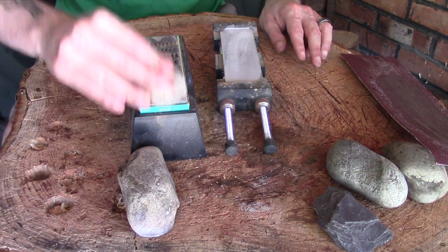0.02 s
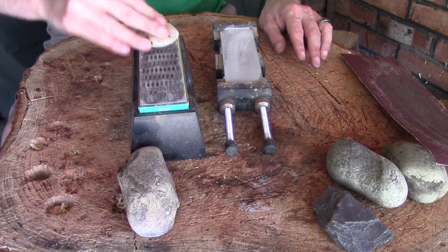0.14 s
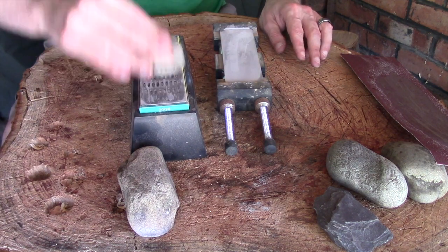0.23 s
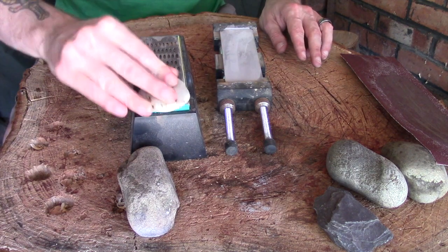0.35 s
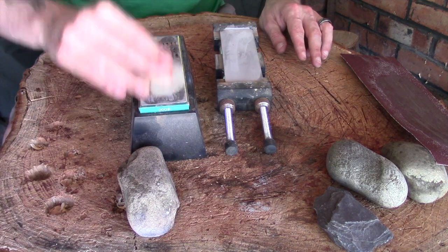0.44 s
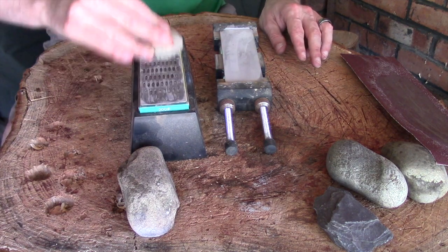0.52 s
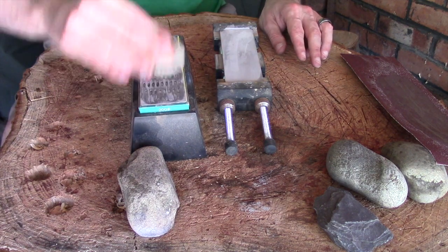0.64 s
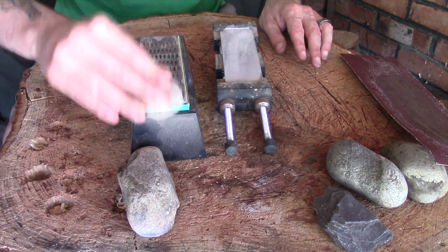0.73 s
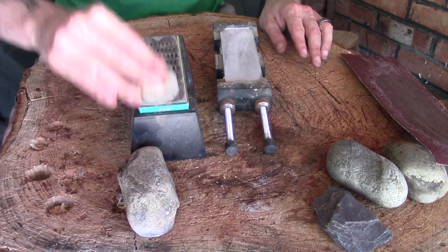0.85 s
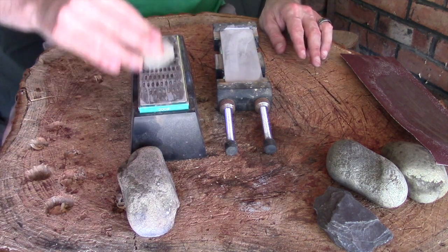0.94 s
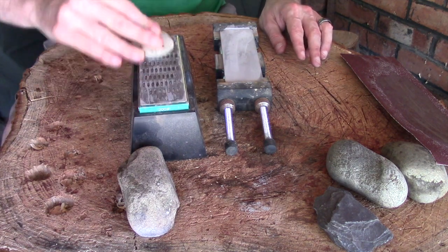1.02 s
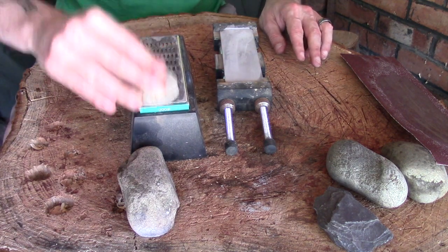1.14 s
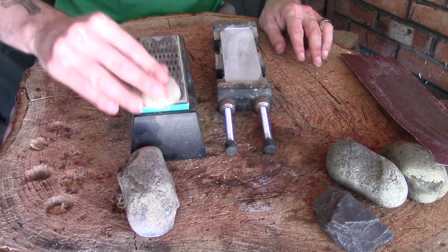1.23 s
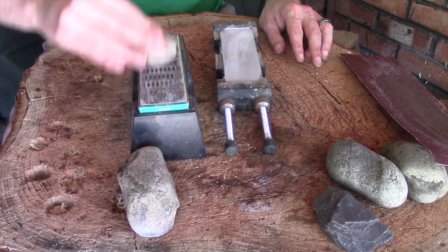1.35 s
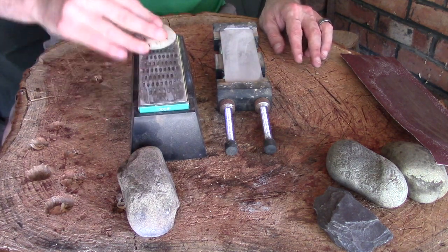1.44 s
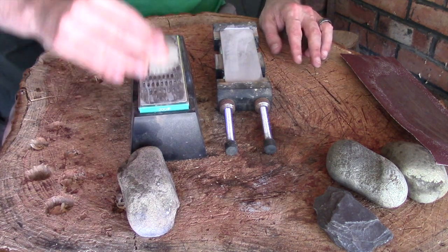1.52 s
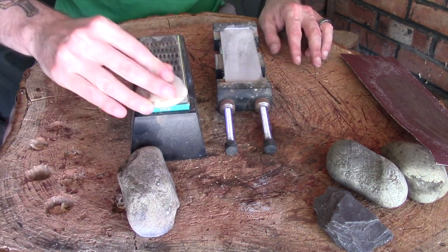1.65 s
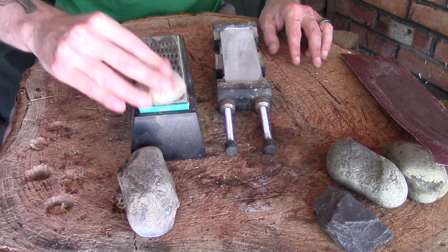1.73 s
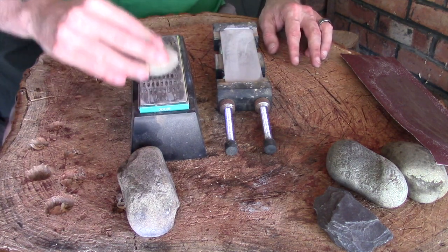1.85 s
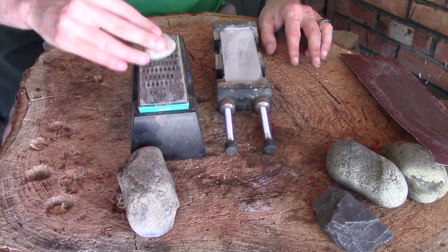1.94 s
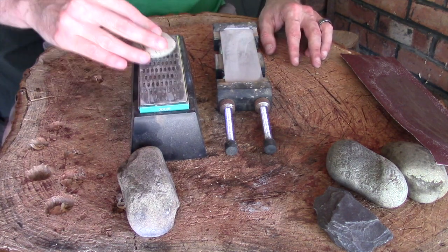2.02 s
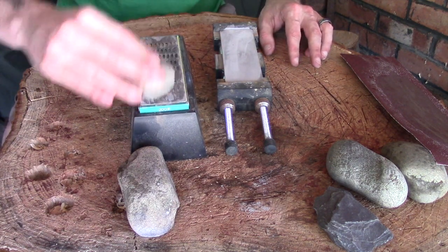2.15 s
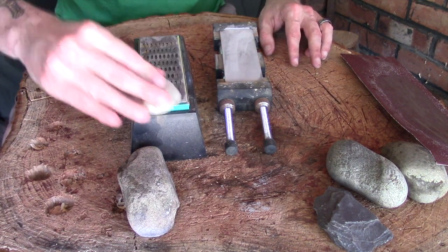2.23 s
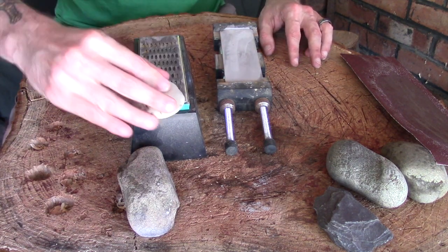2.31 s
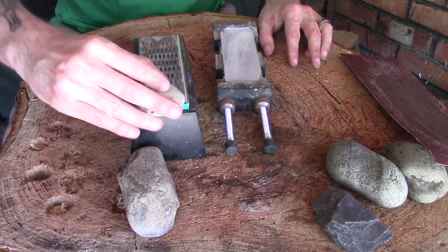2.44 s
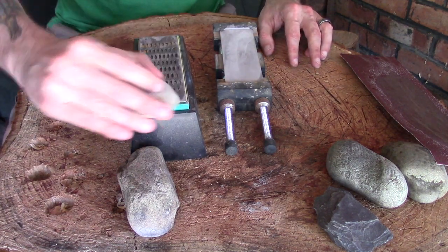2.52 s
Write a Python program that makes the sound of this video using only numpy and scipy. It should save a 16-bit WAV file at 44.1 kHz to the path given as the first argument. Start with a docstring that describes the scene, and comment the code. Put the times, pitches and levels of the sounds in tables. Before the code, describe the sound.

Rapid abrasive scraping of a pebble on a diamond plate, opening with a brief sped-up flutter

```python
"""A thin flutter opens the scene: rubbing strokes about eight times too fast, with resonances raised to match.
Then a pebble is rubbed back and forth on a diamond plate on a wooden slab, outdoors and close: random grit
rasps brighter the faster the pebble slides, rings the plate's holder by resonance and swells into shrill chatter.
At 0.8 s the pebble knocks and rattles against the plate's end; a light tap and a scuff finish the rubbing.
A faint, diffuse stereo haze follows the sounds, over low outdoor air noise."""
import sys
import numpy as np
from scipy import signal
from scipy.fft import rfft, irfft, next_fast_len
from scipy.io import wavfile
from scipy.ndimage import uniform_filter1d, map_coordinates

SR = 44100
rng = np.random.default_rng(int(sys.argv[2]) if len(sys.argv) > 2 else 0)


def store_wav(level_fs):
    """Save 16-bit WAV to argv[1]."""
    pcm = np.round(np.clip(np.atleast_2d(level_fs), -1, 1) * 32767)
    wavfile.write(sys.argv[1], SR, pcm.T.astype(np.int16))


N = 112455  # samples

# Resonances of plate, holder and slab. Each row: frequency in Hz, width in Hz, peak level in dB.
HOLDER_MODES = [(158, 9.9, -1.5), (295.5, 38, -9.5), (408.8, 22.4, 5.5), (493.3, 12, -7), (590, 22, -12),
                (665.4, 8.3, -4.5), (814, 20.4, 1), (865.5, 24, -8.5), (955, 44, -12), (1086, 16, -3.5),
                (1113, 13, -5.5), (1145.4, 16, -1), (1331, 24, -5), (2810, 100, -8.5)]
# Spectrum of the force that sliding passes to the holder. Each row: frequency in Hz, relative level in dB.
HOLDER_DRIVE = [(60, -36), (160, -25), (280, -5), (400, 0), (1200, 2), (3000, -1.5)]


def amp(db):
    """Amplitude ratio, by the definition of the decibel."""
    return 10 ** (np.asarray(db) / 20)


def unit(x):
    """Normalisation to an rms of 1."""
    return x / np.sqrt(np.mean(x ** 2) + 1e-20)


def along(points, hz):
    """Linear interpolation of (Hz, value) points on a logarithmic frequency axis."""
    point_hz, values = np.transpose(points)
    return np.interp(np.log(hz + 1), np.log(point_hz + 1), values)


def wobble(rate):
    """Smooth random curve: spline interpolation between random knots, rate of them a second."""
    return map_coordinates(rng.standard_normal(N), [np.arange(N) * rate / SR], mode="mirror")


def filtered(x, response):
    """Linear filtering: the spectrum is multiplied by a complex response of frequency."""
    size = next_fast_len(N + SR // 2)  # zero padding leaves room for tails
    hz = np.fft.rfftfreq(size, 1 / SR)
    return irfft(rfft(x, size) * response(hz), size)[..., :N]


def coloured(x, spectrum):
    """Spectral shaping by (Hz, dB) points, followed by normalisation to rms 1."""
    return unit(filtered(x, lambda hz: amp(along(spectrum, hz))))


def ring(x, modes, scale=1):
    """Modal superposition: parallel second-order resonances, their frequencies and widths times scale."""
    def response(hz):
        f = hz / scale
        total = 0
        for centre, width, db in modes:
            total = total + amp(db) * 1j * f * width / (centre ** 2 - f ** 2 + 1j * f * width)
        return total
    return filtered(x, response)


def rubbing():
    """Friction excitation: grit rasps and forces the holder's modes while the hand's pressure judders."""
    # Spectrum of the rasp. Each row: frequency in Hz, relative density in dB per Hz.
    rasp_spectrum = [(100, -36), (220, -25), (300, -15), (900, -6), (1400, -10.5), (2000, -11.5),
                     (2400, -5), (2830, -1), (3200, -2.5), (3600, -2.5), (5000, -4.5), (6500, -3),
                     (7700, -2), (9300, -2), (11900, -2.5), (13300, -12), (14200, -6.5), (15500, -13.5)]
    rasp_db, holder_db = -12, -24.5
    judder_per_s, judder_db = 98, 0.88
    bursts_per_s, burst_db = 28, 3  # the holder is driven unevenly

    pressure = snags() * amp(judder_db * wobble(judder_per_s))
    rasp = stroked(rippled(coloured(grit(), rasp_spectrum)), patchy_db=2)
    drive = coloured(grit(), HOLDER_DRIVE)
    bursts = unit(amp(burst_db * wobble(bursts_per_s)))
    body = ring(pressure * bursts * stroked(drive, patchy_db=3.0), HOLDER_MODES)
    body = body / np.std(ring(drive, HOLDER_MODES))  # level relative to steady sliding
    return amp(rasp_db) * pressure * rasp + amp(holder_db) * body


def grit():
    """Shot noise: single diamond grains catch at random instants, over the Gaussian noise of an even grind."""
    grains_per_s, grain_spread_db = 7000, 2.5
    grind_share = 0.66  # of the power
    hit = rng.random(N) < grains_per_s / SR
    size = amp(grain_spread_db * np.minimum(rng.exponential(size=N), 4))
    catches = unit(hit * size * np.sign(rng.standard_normal(N)))
    grind = rng.standard_normal(N)
    return np.sqrt(1 - grind_share) * catches + np.sqrt(grind_share) * grind


def motion(t):
    """Kinematics of reciprocating strokes: speed (dB), place (+1 far, -1 near), brightness and weight (dB)."""
    # Each row: start in seconds, speed left at the turn in dB, full speed in dB, time speeding up in seconds,
    # time slowing down in seconds, brightness in dB, weight on the holder in dB; laws over frequency scale the dB.
    strokes = [(.218, -24, 0, 0.009, 0.059, 0.5, 0), (0.378, -17, .5, 0.021, 0.062, -0.5, -2),
               (0.595, -20, 0, 0.023, 0.076, 1.5, 1.5), (.802, -21.5, -1, 0.02, 0.055, 1, 0),
               (1.025, -17, -1, .022, 0.055, 0, 0), (1.231, -17.5, 0.5, 0.025, 0.059, 0, 0.5),
               (1.457, -18.5, 1, 0.029, 0.074, -1, -0.5), (1.7, -22.5, -2.5, 0.018, 0.073, -2, -2),
               (2.024, -28, 2, 0.033, .16, -4.5, 2.5), (2.362, -22.5, -23.5, .01, .02, -4, 4.5),
               (2.425, -24.5, -10, 0.039, 0.039, -7, -0.5)]
    rest_s, rest_db, settle_db_per_s = 2.486, -33, 202.5  # the pebble comes to rest
    ease_in, ease_out = 2.18, 1.54  # curvature of speeding up and slowing down

    speed = np.where(t < rest_s, -100, rest_db - settle_db_per_s * (t - rest_s))
    place, bright, weight = np.zeros((3, len(t)))
    turns = [row[:2] for row in strokes[1:]] + [(rest_s, rest_db)]
    for k, (stroke, (end, next_db)) in enumerate(zip(strokes, turns)):
        start, turn_db, full_db, rise, fall, bright_db, weight_db = stroke
        on = (t >= start) & (t < end)
        starting = np.clip(1 - (t[on] - start) / rise, 0, 1) ** ease_in
        stopping = np.clip(1 - (end - t[on]) / fall, 0, 1) ** ease_out
        speed[on] = full_db + (turn_db - full_db) * starting + (next_db - full_db) * stopping
        place[on] = (-1) ** k * np.cos(np.pi * (t[on] - start) / (end - start))
        bright[on], weight[on] = bright_db, weight_db
    return speed, place, bright, weight


def stroked(x, patchy_db):
    """Time-varying filtering: motion shapes steady friction and its colour shifts with the contact points."""
    # Gain with sliding speed. Each row: frequency in Hz, dB per dB of speed.
    speed_law = [(300, 0.66), (1200, 0.52), (3000, 1), (8000, 1.34), (14000, 2.36)]
    # Gain at the plate's far end, opposite at the near end. Each row: frequency in Hz, gain in dB.
    far_end = [(300, 0), (1100, -2), (3000, -0.5), (8000, -0.5), (11000, 1.5), (14000, 4)]
    # Spectral tilt of a stroke. Each row: frequency in Hz, dB per dB of brightness.
    bright_law = [(1500, 0), (4000, 0.51), (8000, 1.23), (14000, 1.7)]
    # Effect of the weight on the holder. Each row: frequency in Hz, dB per dB of weight.
    weight_law = [(1300, 0.79), (2400, 0.093)]

    hz, t, z = signal.stft(x, SR, nperseg=256, noverlap=192)
    patches = uniform_filter1d(rng.standard_normal(z.shape), size=6, axis=0)  # smooth over frequency
    patches = unit(uniform_filter1d(patches, size=12, axis=1))  # and over time
    laws = speed_law, far_end, bright_law, weight_law
    db = sum(np.outer(along(law, hz), control) for law, control in zip(laws, motion(t)))
    return signal.istft(z * amp(db + patchy_db * patches), SR, nperseg=256, noverlap=192)[1][:N]


def snags():
    """Catch and relaxation: pressure jumps where grit snags the pebble, then decays exponentially in dB."""
    catches_per_s, catch_db, catch_s = 70, 2.5, 0.0037
    caught = (rng.random(N) < catches_per_s / SR) * (.5 + rng.random(N))  # jumps of random size
    db = catch_db * signal.lfilter([1], [1, -np.exp(-1 / (catch_s * SR))], caught)
    return amp(db - db.mean())


def rippled(x):
    """High modal density: the plate's many close resonances colour the rasp with a random spectral ripple."""
    ripple_db, ripple_width_hz = 1.77, 55
    knots = rng.standard_normal(SR // 8)

    def ripple(hz):
        return amp(ripple_db * map_coordinates(knots, [hz / ripple_width_hz], mode="mirror"))
    return unit(filtered(x, ripple))


def dust():
    """Speed-dependent friction noise: the fine hiss of stone dust lasts even while the pebble slides slowly."""
    # Spectrum of the hiss. Each row: frequency in Hz, relative density in dB per Hz.
    dust_spectrum = [(1000, -30), (4000, -4), (8000, 0), (15000, -4)]
    dust_db, db_per_speed_db = -30, 0.77
    speed, _, bright, _ = motion(np.arange(N) / SR)
    return amp(dust_db + db_per_speed_db * speed + 2 * bright) * coloured(grit(), dust_spectrum)


def chatter():
    """Resonant excitation: short shrill swells in mid-stroke, where the pebble bites hardest."""
    # Gaussian swells. Each row: centre in seconds, half length (standard deviation) in seconds, level in dB.
    swells = [(0.245, .008, -11.5), (.272, 0.011, -10.5), (.465, 0.0067, -8), (0.498, .025, -11.5),
              (0.67, 0.034, -13.5), (0.907, .016, -10), (1.122, 0.018, -9.5), (1.319, .025, -10.5),
              (1.532, 0.019, -11.5), (1.576, 0.0087, -9), (1.818, 0.02, -13), (1.876, 0.014, -15.5),
              (2.127, 0.044, -12.5)]
    # Shrill resonances. Each row: frequency in Hz, width in Hz, relative level in dB.
    shrill_modes = [(6500, 730, 1), (8660, 500, -2), (9410, 970, 1), (10500, 800, -9.5)]
    t = np.arange(N) / SR
    swell = sum(amp(db) * np.exp(-.5 * ((t - s) / half) ** 2) for s, half, db in swells)
    shrill = ring(grit(), shrill_modes)
    return swell * unit(ring(shrill, [(8450, 4800, 0)]))  # one broad resonance around them all


def knocks():
    """Impulse response: each contact's brief push rings the holder's modes, with a short woody thud."""
    # Contacts. Each row: start in seconds, relative strength in dB, contact time in seconds,
    # lowest pitch excited in Hz, relative thud level in dB.
    contacts = [(0.8065, 0, 0.00047, 111, 1), (0.8134, -4.5, 0.00046, 111, -2),
                (0.8266, -13, .0004, 199, -5), (0.835, -6.5, .0004, 200, -5.5),
                (2.367, -8.5, .0003, 450, -20)]
    # Spectrum of the thud. Each row: frequency in Hz, relative density in dB per Hz.
    thud_spectrum = [(80, -48), (150, -24), (270, -3), (600, 1.5), (1200, -0.5), (1800, -14), (5000, -18),
                     (12000, -52)]
    ring_db, thud_gain_db, thud_t60 = 40.5, -8.5, 0.092  # T60 in seconds

    t = np.arange(N) / SR
    push, thud_power = np.zeros(N), np.zeros(N)
    for s, db, contact, low_hz, thud_db in contacts:
        age = np.maximum(t - s, 0)
        pulse = age * np.exp(-2 * age / contact)
        force = filtered(pulse / pulse.sum(), lambda hz: (1j * hz / (low_hz + 1j * hz)) ** 2)
        push += amp(db + ring_db) * force
        thud_power += (t > s) * amp(thud_db - 60 * age / thud_t60) ** 2
    thud = np.sqrt(thud_power) * coloured(rng.standard_normal(N), thud_spectrum)
    return ring(push, HOLDER_MODES) + amp(thud_gain_db) * thud


def fast_strokes():
    """Frequency scaling: sped-up strokes blur into a flutter and the holder's modes move into the treble."""
    # Spectrum of the hiss. Each row: frequency in Hz, relative density in dB per Hz.
    hiss_spectrum = [(100, -10), (500, -11), (1800, -9.5), (2800, -10.5), (4000, -5.5), (7000, 1.5),
                     (10000, -2), (15500, -3.5)]
    times_faster, stroke_s, turn_s, end_s = 8.05, .0261, .0219, .222
    ring_db, hiss_db = -28, -25.5
    shape = 0.41  # below 1 flattens the top of each stroke

    t = np.arange(N) / SR
    speed = np.abs(np.sin(np.pi * (t - turn_s) / stroke_s)) ** shape
    drive = coloured(grit(), [(hz * times_faster, db) for hz, db in HOLDER_DRIVE])
    body = unit(ring(speed * drive, HOLDER_MODES, times_faster))
    hiss = speed * coloured(grit(), hiss_spectrum)
    return (t < end_s) * (amp(ring_db) * body + amp(hiss_db) * hiss)


def haze(x):
    """Decorrelation by convolution with noise: a faint, decaying noisy spread, different at each port."""
    # Spectrum of the spread. Each row: frequency in Hz, gain in dB.
    spread_spectrum = [(100, -15), (300, -28.5), (1000, -29.5), (2000, -40), (5000, -28.5), (9000, -21.5),
                       (13000, -36)]
    t60 = 0.21  # s
    t = np.arange(SR // 4) / SR
    tail = rng.standard_normal((2, len(t))) * amp(-60 * t / t60)
    spread = signal.fftconvolve(x[None], tail / np.linalg.norm(tail[0]), axes=1)[:, :N]
    return filtered(spread, lambda hz: amp(along(spread_spectrum, hz)))


def air():
    """Partly coherent noise field: faint low outdoor background as the sum and difference of two noises."""
    # Spectrum of the background. Each row: frequency in Hz, relative density in dB per Hz.
    air_spectrum = [(25, -12.5), (70, -5), (150, 2.5), (400, -2.5), (1500, -6.5), (6000, -15), (15000, -32)]
    air_db, side_db = -53.5, -6  # side level relative to mid
    mid, side = coloured(rng.standard_normal((2, N)), air_spectrum)
    return amp(air_db) * (mid + amp(side_db) * np.array([side, -side]))


def scene():
    """Superposition at two close ports: nearly mono, with small level and phase differences over frequency."""
    # Level difference of the ports. Each row: frequency in Hz, left minus right in dB.
    left_lead = [(60, -1), (110, 1), (200, 3), (380, 2.5), (700, 2), (1290, 0), (2380, -1.5), (4400, 0.0),
                 (8120, 0.5), (15000, -1.5)]
    # Phase difference of the ports. Each row: frequency in Hz, lead of the left in radians.
    port_phase = [(0, 0), (15200, 0.0036)]
    half = np.array([[.5], [-.5]])  # each port takes half of the difference

    def ports(hz):
        return amp(half * along(left_lead, hz)) * np.exp(1j * half * along(port_phase, hz))
    stone = rubbing() + dust() + chatter() + knocks() + fast_strokes()
    return filtered(stone + haze(stone) + air(), ports)


def record(dry):
    """Soft saturation and band limiting: the highest peaks are rounded, then the top of the treble is cut."""
    ceiling, hardness, top_hz = 1.04, 4.5, 15750  # ceiling in full scales
    clipped = dry / (1 + np.abs(dry / ceiling) ** hardness) ** (1 / hardness)
    return filtered(clipped, lambda hz: hz < top_hz)


dry = scene()
out = record(dry)
store_wav(out)
```